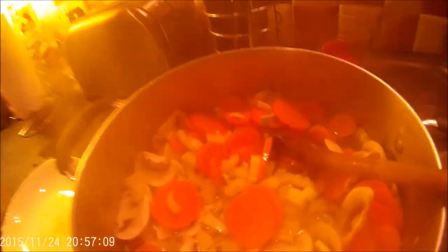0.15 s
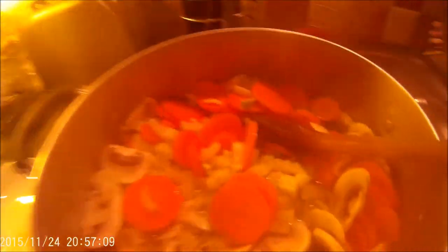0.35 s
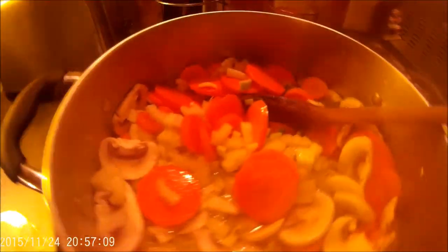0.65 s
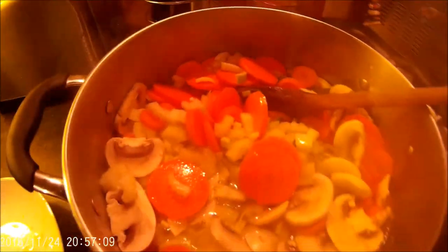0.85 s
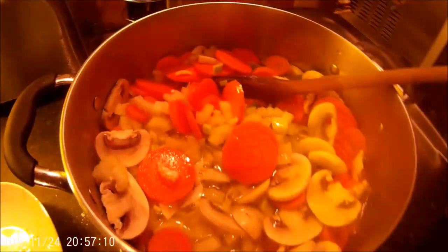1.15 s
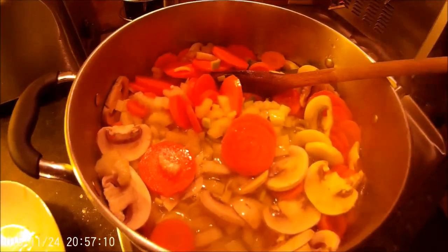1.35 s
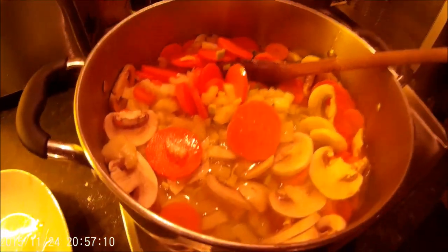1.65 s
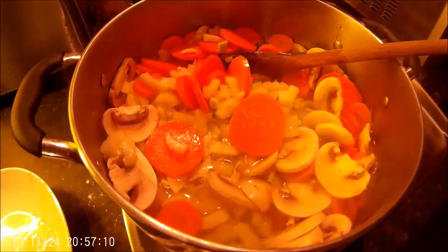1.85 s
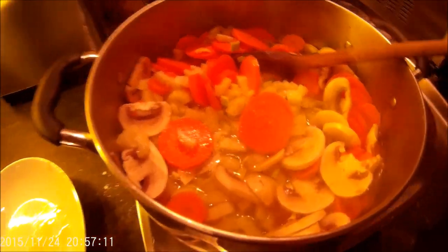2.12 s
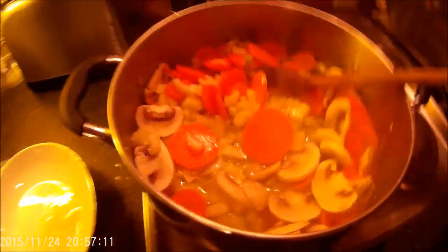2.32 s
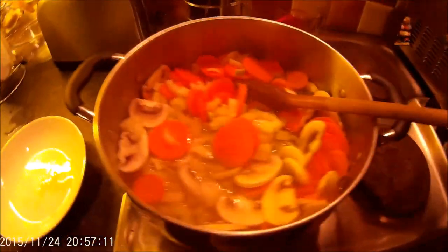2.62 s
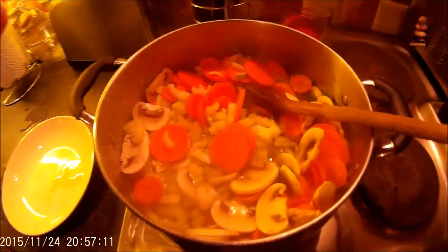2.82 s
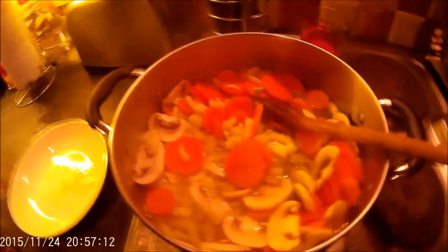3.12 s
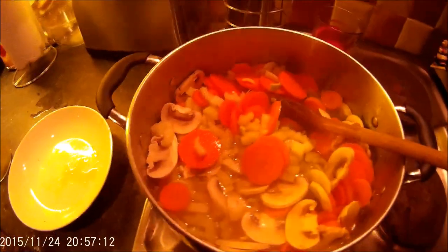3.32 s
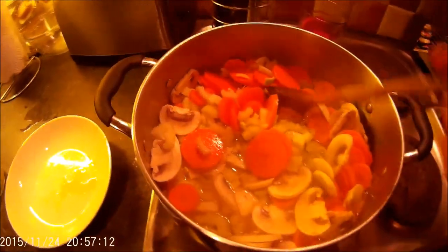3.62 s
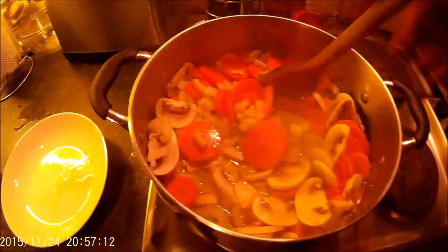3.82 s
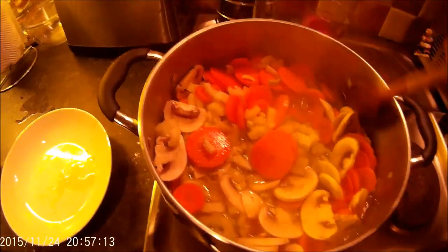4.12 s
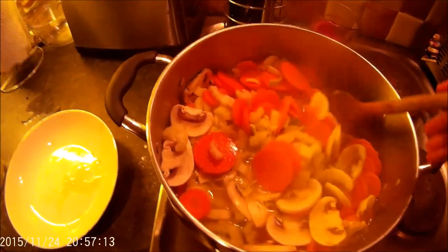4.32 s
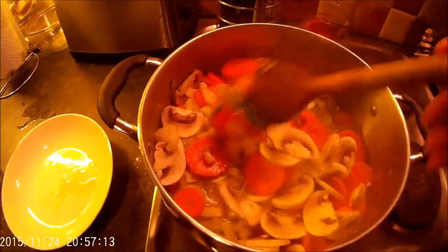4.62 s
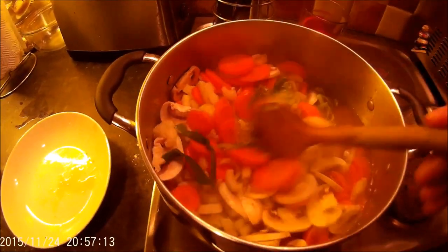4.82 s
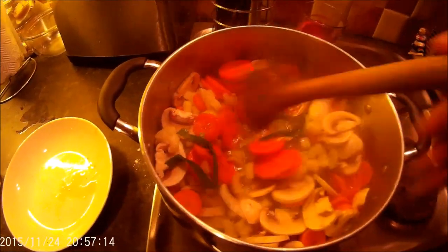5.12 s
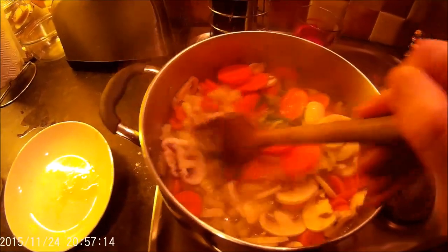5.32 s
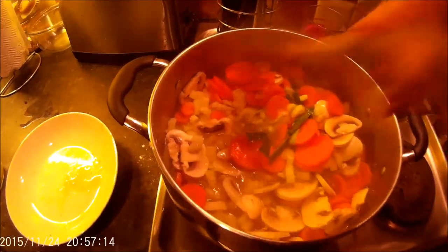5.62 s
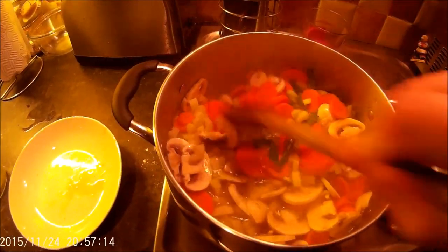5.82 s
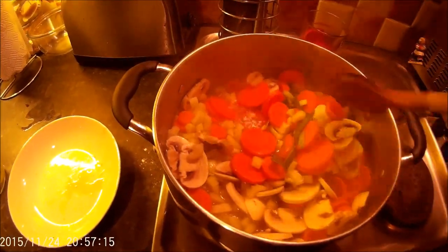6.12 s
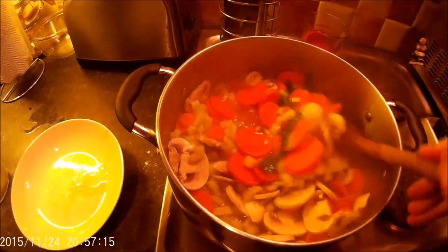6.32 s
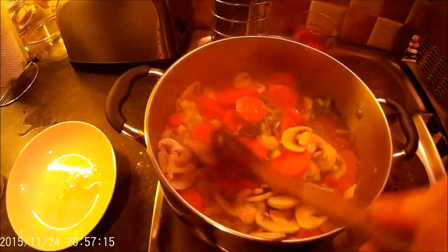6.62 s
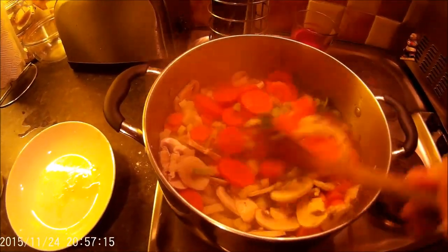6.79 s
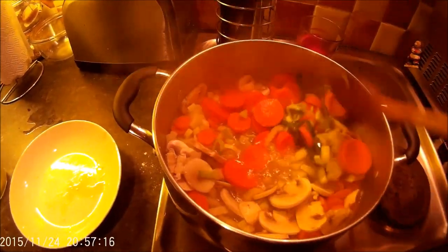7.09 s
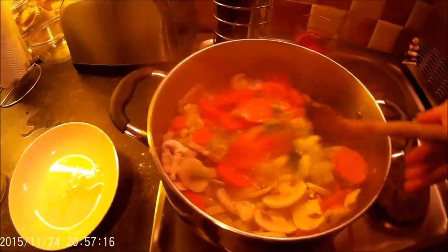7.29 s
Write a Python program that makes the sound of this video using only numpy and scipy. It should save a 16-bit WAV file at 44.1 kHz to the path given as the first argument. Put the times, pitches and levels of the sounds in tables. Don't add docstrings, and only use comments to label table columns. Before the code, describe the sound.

Quiet simmering under fan hum and hiss, a loud boxy drawer thud early on, wet plops, then woody spoon knocks against a steel pot.

```python
import sys
import numpy as np
from scipy import signal
from scipy.fft import rfft, irfft, next_fast_len
from scipy.io import wavfile
from scipy.ndimage import uniform_filter1d

SR = 44100
rng = np.random.default_rng(int(sys.argv[2]) if len(sys.argv) > 2 else 0)


def level_to_linear(level):
    exponent = np.asarray(level, float) / 20
    return 10 ** exponent


def dump(signal):
    limited = np.clip(np.atleast_2d(signal).T, -1, 1)
    pcm = np.round(limited * 32767).astype(np.int16)
    wavfile.write(sys.argv[1], SR, pcm)


N = 328721

# frequency in Hz, density in dB per Hz.
ROOM_NOISE = [(12, -54), (20, -17), (27, -9.5), (53, -2.5), (103, -8), (126, -11.5), (191, -8.5),
              (245, -17.5), (266, -23.5), (298, -14.5), (333, -19), (439, -10), (1670, -32), (13900, -32.5),
              (15500, -36.5)]
# frequency in Hz, width in Hz, rms level in dB.
ROOM_MODES = [(64.4, 3.7, -67), (99.8, 4.7, -65), (185, 6.4, -73.5), (297.6, 9.2, -71.5), (1053, 73, -78),
              (1198, 80, -81.5)]
# time in seconds, level in dB.
SIMMER_LEVEL = [(0, -64), (1, -61), (2, -61.5), (2.4, -66), (2.8, -61), (3.9, -65), (4.3, -56), (4.9, -60),
                (5.5, -62.5), (6.0, -64), (6.7, -57), (7.0, -63.5), (7.45, -65.5)]
# start in seconds, peak in dB, low ring in Hz, brightness in dB.
TOUCHES = [(0.444, -51.5, 636, -28), (0.978, -54, 570, -20), (4.181, -49.5, 1030, -21),
           (4.219, -59, 566, 0), (4.24, -57, 525, -9), (4.279, -44, 880, -10), (4.384, -65, 540, 4),
           (4.417, -38, 980, -11.5), (4.453, -60, 477, -1.5), (4.554, -63, 611, -3), (4.712, -50, 444, -6),
           (4.802, -61, 765, 0), (4.837, -58.5, 600, -1), (4.933, -49, 465, -11), (5.249, -52.5, 674, -4.5),
           (5.297, -64, 490, 3.5), (5.33, -53.5, 1140, -0.5), (5.356, -58, 500, -1),
           (5.692, -60, 600, -0.5), (5.725, -56.5, 510, -3), (5.855, -57, 755, -3),
           (5.868, -47.5, 623, -4.5), (5.895, -63, 610, 6.5), (5.924, -57, 546, -2.5),
           (6.516, -55, 756, -0.5), (6.56, -46.5, 430, -17), (6.642, -51, 630, -26), (6.791, -58, 605, -1),
           (6.821, -42, 658, -11), (7.442, -65, 433, 4)]
# start in seconds, peak in dB, hardness of the contact in Hz, crack in dB.
DRAWER_BUMPS = [(1.2350, -22.5, 1530, -51), (1.243, -41, 890, -55), (1.283, -57, 910, -60),
                (1.311, -30.5, 900, -60), (1.345, -34, 910, -66), (1.39, -43, 800, -70),
                (1.417, -42, 1200, -60), (1.4315, -14.5, 1500, -46), (1.437, -21, 885, -46.5),
                (1.442, -17.5, 300, -57), (1.451, -17, 200, -69), (1.489, -28, 500, -61),
                (1.534, -28.5, 250, -61)]
# frequency in Hz, level in dB, t60 in seconds.
PANEL_MODES = [(62.5, -12, 0.46), (112.2, -4.5, 0.22), (210, -7, 0.056), (290.3, -2.5, 0.09),
               (369.5, -7, 0.067), (439, -6, 0.096), (529, -11.5, 0.33), (610, -12, 0.14),
               (730, -7.5, 0.05), (848, -7.5, 0.046), (972, -8, 0.063), (1080, -9.5, 0.091),
               (1153, -10.5, 0.12), (1346, -8, 0.045), (1530, -9.5, 0.039), (1780, -14.5, 0.054),
               (2120, -19.5, 0.052), (2330, -19, 0.031), (2740, -28, 0.017), (3080, -40, 0.017),
               (3750, -30.5, 0.015), (4250, -43, .02)]
# start in seconds, length in seconds, level in dB.
RAIL_RUN = [
    (1.24, 0.22, -41),
]
# start in seconds, peak in dB, first Hz, last Hz, length in seconds.
BUBBLES = [(2.427, -53.5, 1705, 1780, 0.038), (2.44, -46, 1090, 1930, 0.0022),
           (2.936, -47, 1670, 1540, 0.023), (2.951, -31, 1450, 1800, 0.006),
           (2.952, -46, 1850, 1700, 0.0072), (3.102, -45, 697, 810, 0.023), (3.119, -34.5, 783, 895, 0.01),
           (3.125, -28, 750, 780, 0.011), (3.13, -30.5, 792, 1455, 0.0128),
           (3.125, -28.5, 910, 1620, 0.0028), (3.141, -35, 1240, 1400, 0.0079),
           (3.143, -42, 1300, 1240, 0.011)]
# start in seconds, length in seconds, level in dB.
BURST_SPRAY = [
    (2.436, .025, -75),
    (2.951, .003, -61),
    (3.11, .012, -65),
    (3.126, 0.011, -46.5),
]
# start in seconds, peak in dB, tilt in dB per octave, spoon ring in dB, rim ring in dB.
SPOON_HITS = [(4.0285, -29.5, -1, -24.5, -49), (4.036, -29, -3.5, -34.5, -62),
              (4.059, -30, -4.5, -36.5, -72), (4.068, -37, 0.5, -42, -80), (6.1815, -23.5, 0.5, -54, -54),
              (6.1842, -20.5, -1, -27, -71), (6.189, -30, -2, -66, -78), (6.242, -35, -3.5, -57, -66),
              (6.26, -44, -10.5, -59, -80), (7.121, -42, -7, -57, -76), (7.14, -43, -5, -59, -80)]
# frequency in Hz, level in dB, t60 in seconds.
POT_MODES = [(328, -3.5, 0.02), (354, -8, 0.057), (510, -4.5, 0.04), (563, -1.5, 0.031), (728, 6.5, 0.0066),
             (873, 4.5, 0.022), (948, 0.5, 0.011), (1460, -5.5, 0.021), (1577, -5.5, 0.017),
             (1780, -38, 0.03), (1870, -13, 0.0085), (2330, -17, 0.035), (2510, -26.5, .02)]
# frequency in Hz, level in dB, t60 in seconds.
SPOON_MODES = [(1091, 1, 0.051), (1258, 2.5, 0.014)]
# frequency in Hz, level in dB, t60 in seconds.
RIM_MODES = [(3410, 0.5, 0.0081), (4030, 0.5, 0.035), (4780, -5, 0.014)]
# start in seconds, length in seconds, level in dB.
WALL_SKIDS = [
    (4.04, 0.027, -52),
    (6.2, 0.046, -54),
    (7.123, 0.017, -48.5),
]
# start in seconds, length in seconds, scrape level in dB.
SCRAPES = [(4.4, 0.17, -73), (4.82, 0.073, -75), (5.31, 0.047, -67.5), (5.68, 0.026, -71.5),
           (5.87, 0.047, -69.5), (6.25, 0.19, -74.5), (6.63, 0.027, -80), (6.79, .03, -71), (6.95, .1, -85),
           (7.18, .1, -75.5), (7.44, .05, -82)]
# frequency in Hz, width in Hz, level in dB.
BOTTOM_MODES = [(600, 250, 0), (1250, 160, -1), (1800, 130, 2), (2000, 200, -3), (2350, 220, -2)]
# centre in Hz, t60 in seconds, level in dB.
REVERB_BANDS = [(60, 0.24, 3), (116, 0.67, -3), (261, 0.33, 5.5), (500, 0.38, 3.5), (990, 0.51, -1.5),
                (1930, 0.32, 3), (4300, 0.13, 2.5)]
# time in seconds, lowest affected frequency in Hz.
THIN_MOMENTS = [(0.114, 1722), (0.221, 1722), (0.306, 3273), (0.456, 2239), (0.499, 1205), (0.519, 1190),
                (0.56, 1920), (0.861, 3100), (0.947, 2080), (1.544, 3273), (1.778, 1740), (1.906, 2067),
                (2.014, 1550), (2.44, 3250), (2.504, 1560), (2.653, 2928), (3.251, 1580), (3.529, 1894),
                (4.003, 3300), (5.042, 2530), (5.812, 2928), (6.11, 3273), (6.237, 3200), (6.344, 2440),
                (6.707, 1894), (6.92, 3273), (7.262, 5512), (7.389, 2560)]


def at_hz(points, hz):
    return np.interp(np.log(hz), np.log(np.array(points)[:, 0]), np.array(points)[:, 1])


def in_time(rows):
    s, level_db = np.transpose(rows)
    return level_to_linear(np.interp(np.arange(N) / SR, s, level_db, left=-150, right=level_db[-1]))


def rms_one(x):
    return x / np.sqrt(np.mean(x ** 2) + 1e-20)


def drift(rate):
    knots = rng.standard_normal(800)
    return np.interp(np.arange(N) / SR * rate, np.arange(len(knots)), knots)


def low_pass(x, order, hz):
    return signal.sosfilt(signal.butter(order, hz, fs=SR, output="sos"), x)


def high_pass(x, order, hz):
    return signal.sosfilt(signal.butter(order, hz, "high", fs=SR, output="sos"), x)


def ring(clicks, hz, t60):
    r, w = level_to_linear(-60 / (t60 * SR)), 2 * np.pi * hz / SR
    return signal.lfilter([0, np.sin(w)], [1, -2 * r * np.cos(w), r * r], clicks + 1e-18)


def resonance(x, hz, width_hz):
    r = np.exp(-np.pi * width_hz / SR)
    poles = [1, -2 * r * np.cos(2 * np.pi * hz / SR), r * r]
    return signal.lfilter(np.array([1, 0, -1]) * (1 - r * r) / 2, poles, x)


def steep_resonance(x, hz, width_hz):
    return resonance(resonance(x, hz, width_hz), hz, width_hz)


def grains(per_s, spread_db):
    sizes = level_to_linear(spread_db * np.minimum(rng.exponential(1, N), 5)) * rng.choice([-1, 1], N)
    return sizes * (rng.random(N) < per_s / SR)


def strokes(rows, rise_db_per_s, fall_db_per_s):
    t, level_db = np.arange(N) / SR, np.full(N, -150.)
    for s, length, db in rows:
        rise = rise_db_per_s * np.maximum(s - t, 0)
        fall = fall_db_per_s * np.maximum(t - s - length, 0)
        level_db = np.maximum(level_db, db - rise - fall)
    return level_to_linear(level_db)


def struck(modes, times, strength_db, spread_db, longest_s):
    at, out = (np.array(times) * SR).astype(int), np.zeros(N)
    span = slice(at.min(), at.max() + SR)
    luck = rng.standard_normal((len(at), len(modes)))
    for k, (hz, level_db, t60) in enumerate(modes):
        clicks = np.zeros(N)
        clicks[at] = level_to_linear(strength_db(hz) + level_db + spread_db * luck[:, k]) * (-1) ** k
        out[span] += ring(clicks[span], hz, min(t60, longest_s * 1000 / hz))
    return low_pass(out, 2, 7000)


def background():
    size = next_fast_len(N, True)
    hz = np.maximum(np.arange(size // 2 + 1) * SR / size, 1)
    spectrum = rfft(rng.standard_normal(size)) * level_to_linear(at_hz(ROOM_NOISE, hz))
    noise = rms_one(irfft(spectrum, size)[:N])
    white, drones = rng.standard_normal(N), np.zeros(N)
    for mode_hz, width_hz, db in ROOM_MODES:
        drones += level_to_linear(db + 0.74 * drift(2.67)) * rms_one(resonance(white, mode_hz, width_hz))
    return level_to_linear(-61) * noise + drones


def simmer():
    clicks, pitch = grains(per_s=240, spread_db=-0.5), rng.integers(0, 14, N)
    rings = np.zeros(N)
    for k, hz in enumerate(np.geomspace(230, 760, 14)):
        rings += ring(clicks * (pitch == k), hz, 44 / hz)
    muffled = signal.lfilter([.15], [1, -.85], rings)
    return in_time(SIMMER_LEVEL) * level_to_linear(-2) * rms_one(muffled)


def nudges():
    out, click, t = np.zeros(N + SR), np.zeros(SR // 10), np.arange(SR // 10) / SR
    click[:14] = np.hanning(14) / 6
    wet = rms_one(steep_resonance(rng.standard_normal(N + SR), 1120, 1070))
    for s, peak_db, low_hz, high_db in TOUCHES:
        at = int(s * SR)
        high_hz = 1823 * 2 ** (0.53 * min(high_db, 0))
        smack = .2 * wet[at:at + len(t)] * np.exp(-t / .006)
        bright = ring(click, high_hz, 36 / high_hz) + smack
        dull = ring(click, low_hz, 20 / low_hz)
        out[at:at + len(t)] += level_to_linear(peak_db + 1.5) * (dull + level_to_linear(high_db + 6.5) * bright)
    return high_pass(out[:N], 2, 250)


def drawer():
    s, peak_db, hard_hz, crack_db = np.transpose(DRAWER_BUMPS)

    def strength_db(hz):
        return peak_db - 5 - 10 * np.log10(1 + (hz / hard_hz) ** 2)

    bumps = struck(PANEL_MODES, s, strength_db, spread_db=3, longest_s=.05)
    shocks, rails = grains(per_s=700, spread_db=3), np.zeros(N)
    for k, (hz, db, t60) in enumerate(PANEL_MODES):
        rails += level_to_linear(db + 2.5 * np.log2(hz / 500)) * ring(shocks, hz, t60 / 4) * (-1) ** k
    slide = strokes(RAIL_RUN, rise_db_per_s=3500, fall_db_per_s=100) * rms_one(rails)
    hits = np.zeros(N)
    hits[(s * SR).astype(int)] = level_to_linear(crack_db)
    decay = signal.lfilter([1], [1, -np.exp(-1 / (0.0049 * SR))], hits + 1e-18)
    slap = rng.standard_normal(N) * decay
    crack = np.zeros(N)
    for hz, db in [(2700, 13.5), (4000, -30), (6300, -3.5)]:
        crack += level_to_linear(db) * steep_resonance(slap, hz, 1400)
    return bumps + crack + slide


def plops():
    out, white, spray = np.zeros(N), rng.standard_normal(N), np.zeros(N)
    for hz, db in [(1300, -20), (2150, 24.5), (3900, 15.5)]:
        spray += level_to_linear(db) * steep_resonance(white, hz, 600)
    spray = rms_one(spray) * strokes(BURST_SPRAY, rise_db_per_s=2500, fall_db_per_s=1500)
    froth = level_to_linear(4.1 * signal.lfilter([.25], [1, -.97], rng.standard_normal(N)))
    for s, peak_db, first_hz, last_hz, length in BUBBLES:
        at, t = int(s * SR), np.arange(int(length * SR)) / SR
        phase = 2 * np.pi * (first_hz + (last_hz - first_hz) * t / length / 2) * t
        swell = np.sin(np.pi * (t / length) ** .8) ** 1.5
        span = slice(at, at + len(t))
        pocket = swell * froth[span] * np.sin(phase)
        out[span] += level_to_linear(peak_db) * pocket / np.abs(pocket).max()
    return low_pass(out + spray, 3, 5500)


def knocks():
    s, peak_db, tilt_db, spoon_db, rim_db = np.transpose(SPOON_HITS)

    def strength_db(hz):
        return peak_db - 0.5 + tilt_db * np.log2(hz / 1000)

    wall = struck(POT_MODES, s, strength_db, spread_db=2.5, longest_s=.04)
    spoon = struck(SPOON_MODES, s, lambda hz: spoon_db, spread_db=1.5, longest_s=.06)
    rim = struck(RIM_MODES, s, lambda hz: rim_db, spread_db=1.5, longest_s=.25)
    rub, skid = grains(per_s=1500, spread_db=3), np.zeros(N)
    for k, (hz, db, t60) in enumerate([*POT_MODES, *SPOON_MODES]):
        skid += level_to_linear(db - 4 * np.log2(hz / 1000)) * ring(rub, hz, t60) * (-1) ** k
    skid = rms_one(skid) * strokes(WALL_SKIDS, rise_db_per_s=4000, fall_db_per_s=261)
    return high_pass(wall + spoon + rim + skid, 2, 200)


def stirring():
    slips, body = grains(per_s=900 * level_to_linear(7 * drift(40)), spread_db=3.5), np.zeros(N)
    for hz, width_hz, db in BOTTOM_MODES:
        body += level_to_linear(db) * resonance(slips, hz, width_hz)
    body = low_pass(body, 4, 2700)
    return strokes(SCRAPES, rise_db_per_s=142, fall_db_per_s=114) * rms_one(body)


def kitchen(x):
    t, tail = np.arange(SR) / SR, np.zeros(SR)
    for hz, t60, level_db in REVERB_BANDS:
        band = signal.butter(2, [hz / np.sqrt(2), hz * np.sqrt(2)], "band", fs=SR, output="sos")
        noise = signal.sosfilt(band, rng.standard_normal(SR))
        tail += noise * level_to_linear(level_db - 60 * t / t60) / np.sqrt(t60 * SR / 20)
    build_up = 1 - np.exp(-t / .025)
    return signal.fftconvolve(x, tail * build_up)[:N]


def thin_treble(x):
    frame_s, first_frame_s = 1024 / 48000, .008
    coarseness = 3.8
    out, half = x.copy(), round(frame_s * SR)
    n, k = np.arange(2 * half) + .5, np.arange(half)[:, None] + .5
    window = np.sin(np.pi * n / (2 * half))
    basis = np.sqrt(2 / half) * np.cos(np.pi / half * (n + half / 2) * k) * window
    line_hz = k[:, 0] / (2 * frame_s)
    for s, lowest_hz in THIN_MOMENTS:
        frame = round((s - first_frame_s) / frame_s)
        centre = round((first_frame_s + frame_s * frame) * SR)
        span = slice(centre - half, centre + half)
        lines = basis @ x[span]
        step = coarseness * np.sqrt(uniform_filter1d(lines ** 2, size=61))
        error = np.sign(lines) * step * np.floor(np.abs(lines) / step + .4) - lines
        out[span] += (error * (line_hz > lowest_hz)) @ basis
    return out


def scene():
    small, far, pot = nudges() + stirring(), drawer(), knocks()
    wet = kitchen(level_to_linear(-5) * far + level_to_linear(-7) * pot + level_to_linear(-6) * small)
    return (background() + simmer() + small + far + plops() + pot + wet)[None]


def band_limit(x):
    return signal.sosfilt(signal.butter(12, 15750, fs=SR, output="sos"), x)


def record(dry):
    mix = thin_treble(dry[0])[None]
    return band_limit(mix)


dry = scene()
out = record(dry)
dump(out)
```